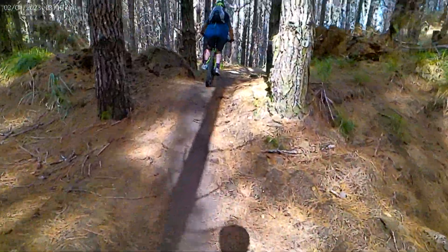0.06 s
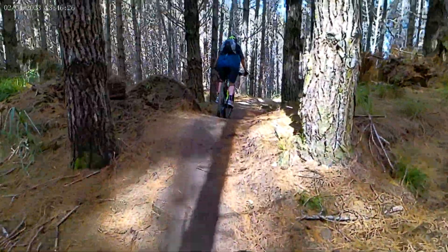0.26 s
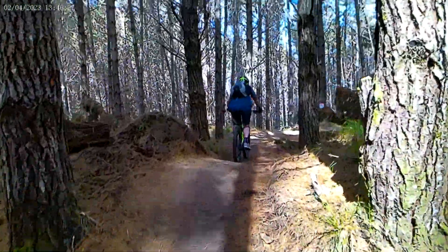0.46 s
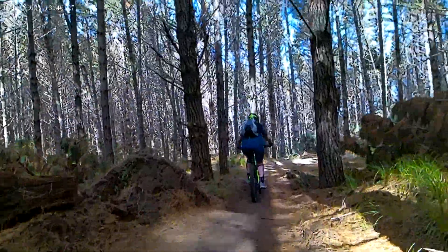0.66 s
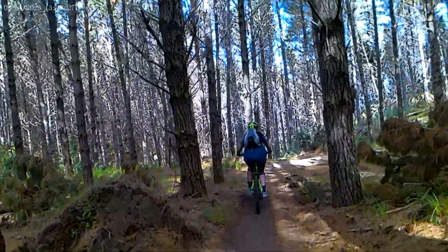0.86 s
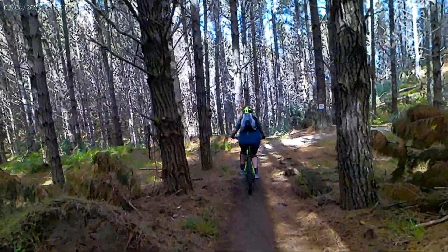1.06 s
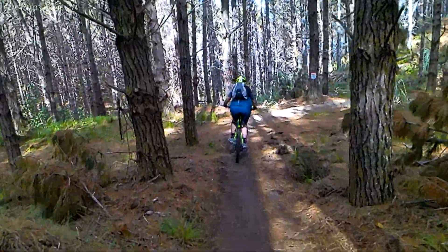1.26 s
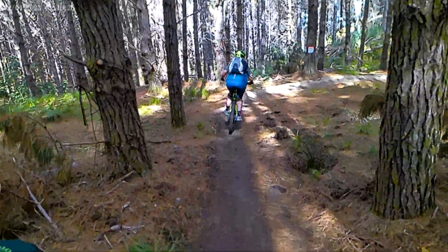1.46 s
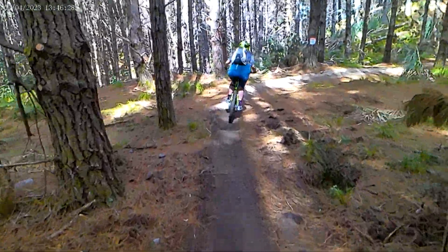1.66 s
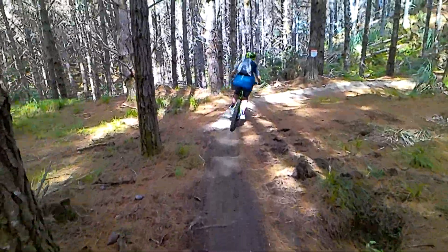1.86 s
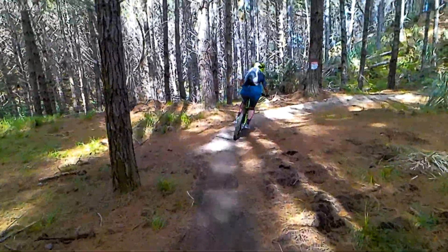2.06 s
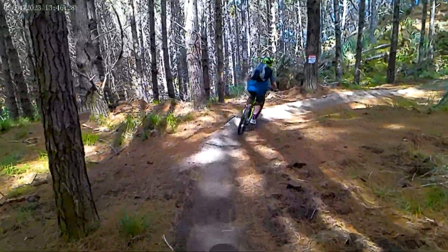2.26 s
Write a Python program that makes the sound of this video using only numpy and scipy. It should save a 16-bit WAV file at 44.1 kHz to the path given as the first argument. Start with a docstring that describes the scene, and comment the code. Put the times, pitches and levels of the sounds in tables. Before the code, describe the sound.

Mountain bike jolting along a dirt forest trail, irregular deep thuds and hard knocks on the microphone

```python
"""A dirt forest trail, ridden on a mountain bike with the camera's microphone carried by the rider.
Bumps heave the camera with soft, deep thuds: pulses through sprung masses, with shudders of dull noise.
Short contacts knock it on its mount, where it rocks, rings and rattles; the hardest overload the input.
Underneath, shaped noise gives a faint ride rumble, tyres on dry needles and hiss; small ticks of
chain and grit are noise bursts that ring briefly."""
import sys
import numpy as np
from scipy import signal
from scipy.fft import rfft, irfft
from scipy.io import wavfile

SR = 44100
rng = np.random.default_rng(int(sys.argv[2]) if len(sys.argv) > 2 else 0)


def master_out(mix):
    """Clip the mix to full scale and print it as 16-bit PCM to the path in sys.argv[1]."""
    frames = np.transpose(np.atleast_2d(mix))
    ceiling = np.clip(frames, -1, 1)
    pcm = np.round(ceiling * 32767).astype(np.int16)
    wavfile.write(sys.argv[1], SR, pcm)


N = 103635
T = np.arange(N) / SR  # time in seconds


def from_db(db):
    """Decibels to amplitude gain."""
    return 10 ** (np.asarray(db) / 20)


def noise(spectrum):
    """Noise of rms 1, coloured by (Hz, relative dB per Hz) points joined on a log-frequency axis."""
    hz, db = np.transpose(spectrum)
    bins = np.maximum(np.arange(N + 1) * SR / (2 * N), 1)
    gain = from_db(np.interp(np.log(bins), np.log(hz), db))
    x = irfft(rfft(rng.standard_normal(2 * N)) * gain)[:N]
    return x / x.std()


def drift(hz):
    """Random wander of spread 1: white noise smoothed by two equal poles at hz."""
    pole = np.exp(-2 * np.pi * hz / SR)
    white = rng.standard_normal(N + SR)
    x = signal.lfilter([1], [1, -2 * pole, pole * pole], white)[SR:]  # drop the filter's first second
    return x / x.std()


def sprung(force, hz, q):
    """Acceleration of a mass on a damped spring: a second-order high-pass of the force."""
    w = 2 * np.pi * hz
    b, a = signal.bilinear([1, 0, 0], [1, w / q, w * w], SR)
    return signal.lfilter(b, a, force + 1e-18)  # the offset avoids slow denormal numbers


def ring(force, hz, t60):
    """One mode, driven by the force and falling 60 dB in t60 seconds; gain about 1 at its pitch."""
    r = from_db(-60 / (t60 * SR))
    w = 2 * np.pi * hz / SR
    gain = (1 - r * r) / 2
    return gain * signal.lfilter([1, 0, -1], [1, -2 * r * np.cos(w), r * r], force + 1e-18)


def push(s, db, width_ms):
    """A bell-shaped pulse of force centred on s seconds; the width is its standard deviation."""
    return from_db(db) * np.exp(-.5 * ((T - s) * 1000 / width_ms) ** 2)


def burst(s, db, attack_s, decay_s):
    """Envelope with a straight rise from s seconds and an exponential fall."""
    rise = np.clip((T - s) / attack_s, 0, 1)
    fall = np.exp(-np.maximum(T - s - attack_s, 0) / decay_s)
    return from_db(db) * rise * fall


def rolling():
    """Rumble of the ride and rustle of the tyres: coloured noise whose level moves and flutters."""
    # Levels of the rumble and of the tyres. Each row: time in seconds, level in dB before flutter.
    ride_level = [(0, -33), (.3, -42), (.68, -38), (.8, -38.5), (.87, -42), (1.0, -38), (1.12, -47),
                  (1.32, -46), (1.38, -32.5), (1.55, -45), (1.7, -41.5), (1.88, -43), (2.0, -38.5),
                  (2.12, -43.5), (2.35, -43)]
    rolling_level = [(0, -51.5), (.45, -55), (1.0, -55.5), (1.15, -55.5), (1.4, -55.5), (1.8, -56),
                     (2.1, -55.5), (2.35, -54)]
    # Colours of the rumble and of the tyres. Each row: frequency in Hz, relative level in dB per Hz.
    rumble_colour = [(20, 7), (45, -1.5), (80, 0), (115, -6), (175, -9), (290, -17.5), (500, -28),
                     (900, -35.5), (2000, -72)]
    tyre_colour = [(200, 2.5), (420, 8.5), (600, 2), (950, 2.5), (1250, 0.5), (1550, 1), (2000, -0.5),
                   (3100, -9), (3800, -9.5), (4350, -8), (5500, -15.5), (6900, -13), (9000, -18)]
    rumble_flutter_db, rumble_flutter_hz = 3.14, 60
    tyre_flutter_db, tyre_flutter_hz = 2, 46

    rumble_db = np.interp(T, *np.transpose(ride_level)) + rumble_flutter_db * drift(rumble_flutter_hz)
    rumble = from_db(rumble_db) * noise(rumble_colour)
    tyre_db = np.interp(T, *np.transpose(rolling_level)) + tyre_flutter_db * drift(tyre_flutter_hz)
    tyres = from_db(tyre_db) * noise(tyre_colour)
    return rumble + tyres


def bumps():
    """Slow pushes through the suspension heave the camera, each with a dull shudder of noise."""
    # Bumps. Each row: pulse centre in seconds, force in dB, pulse width in ms, shudder level in dB.
    bump_rows = [(0.119, -15.5, 7.9, -44), (0.3363, -7, 8.2, -34.5), (0.5427, -7, 6.6, -36),
                 (0.744, -19.5, 14.2, -52), (0.945, -19.5, 7.8, -49), (1.24, -24.5, 9.3, -45.5),
                 (1.4584, -5, 5.16, -28), (2.068, -10.5, 8.1, -37), (2.273, -13.5, 14.3, -68)]
    # Colour of the shudder. Each row: frequency in Hz, relative level in dB per Hz.
    shudder_colour = [(50, -37), (110, 4.5), (200, 11), (350, 0), (700, -9.5), (1500, -19), (3000, -51),
                      (8000, -55)]
    heave_hz, heave_q, heave_cut_hz = 14.24, 0.82, 6.96
    lead_s, attack_s, decay_s = 0.017, 0.0071, 0.031  # the shudder starts ahead of the pulse centre

    force = sum(push(s, db, width_ms) for s, db, width_ms, _ in bump_rows)
    envelope = sum(burst(s - lead_s, db, attack_s, decay_s) for s, _, _, db in bump_rows)
    heave = sprung(force, heave_hz, heave_q)
    heave = sprung(heave, heave_cut_hz, np.sqrt(.5))  # a second low cut
    return envelope * noise(shudder_colour) - heave


def knocks():
    """Short contacts rock the camera on its mount, as a mass on a spring; the housing rings and rattles."""
    # Knocks. Each row: contact centre in seconds, force in dB, contact width in ms, rocking pitch in Hz,
    # rocking Q, rattle level in dB.
    knock_rows = [(0.2022, 18.5, 1.15, 71.2, 0.78, -30), (0.3902, 24.5, 0.77, 73.7, 0.72, -23),
                  (.5980, 14, 1.08, 81.9, 0.79, -27), (0.7766, -12, 1.5, 74.5, 0.87, -45.5),
                  (0.992, -22.5, 1.4, 90.5, 1.54, -59.5), (1.4557, -4.5, 0.98, 184, 2.53, -31),
                  (1.9212, 9, 2.07, 65, 0.78, -37.5), (2.1300, -17, 2, 85, 0.74, -64)]
    # Modes of the housing. Each row: pitch in Hz, gain in dB, time to fall 60 dB in seconds.
    housing_modes = [(112.1, -8, .05), (198.7, -1.29, 0.0071), (480, -37, 0.061)]
    # Colour of the rattling housing. Each row: frequency in Hz, relative level in dB per Hz.
    rattle_colour = [(60, 6), (130, -29), (270, 35), (480, -32), (600, 26), (800, 1), (1100, -3),
                     (1650, -9), (3000, -40), (8000, -32)]
    lift_share, lift_lead_widths = 0.494, 0.52  # the load lifts just before each contact
    lead_s, attack_s, decay_s = 0.0038, 0.0071, 0.012  # the rattle starts ahead of the contact centre

    out = 0
    rattle_noise = noise(rattle_colour)
    for s, db, width_ms, rock_hz, rock_q, rattle_db in knock_rows:
        lift_s = s - lift_lead_widths * width_ms * .001
        force = push(s, db, width_ms) - lift_share * push(lift_s, db, width_ms)
        rocking = sprung(force, rock_hz, rock_q)
        rings = 0
        for k, (hz, mode_db, t60) in enumerate(housing_modes):
            direction = (-1) ** k  # the modes swing in alternate directions
            rings = rings + direction * from_db(mode_db) * ring(force, hz, t60)
        rattle = burst(s - lead_s, rattle_db, attack_s, decay_s) * rattle_noise
        out = out + rocking + rings + rattle
    return out


def ticks():
    """Faint ticks of chain and grit: noise bursts, each ringing briefly in the part that it strikes."""
    # Ticks. Each row: start in seconds, burst level in dB before ringing, ring pitch in Hz.
    tick_rows = [(0.871, -51.5, 1800), (0.882, -46, 1320), (.947, -54.5, 1320), (.978, -53, 1200),
                 (1.234, -58, 1320), (1.271, -49, 1710), (1.324, -45, 1280), (1.385, -49, 1530),
                 (1.451, -41.5, 1570), (1.497, -53.5, 1545), (1.544, -50, 2240), (2.242, -48, 1190),
                 (2.279, -54, 1800), (2.326, -54, 1550), (2.335, -47.5, 1810)]
    # Colour of a tick. Each row: frequency in Hz, relative level in dB per Hz.
    tick_colour = [(500, -53), (900, 9), (1250, 9), (2000, 6), (3000, -7.5), (4400, -1.5), (6500, -20.5),
                   (14000, -18)]
    attack_s, decay_s = 0.00078, 0.0058
    ring_db, ring_t60_s = 9, 0.019

    out = 0
    grit = noise(tick_colour)
    for s, db, hz in tick_rows:
        tick = burst(s, db, attack_s, decay_s) * grit
        out = out + tick + from_db(ring_db) * ring(tick, hz, ring_t60_s)
    return out


def scene():
    """Everything that reaches the one microphone."""
    return (rolling() + bumps() + knocks() + ticks())[None]


def record(dry):
    """The input clips hard knocks; the electronics hiss; a steep low-pass cuts the top."""
    overload = .705  # clipping level, of full scale
    hiss_db, cutoff_hz = -60, 15900
    clipped = np.clip(dry, -overload, overload)
    hissing = clipped + from_db(hiss_db) * rng.standard_normal(dry.shape)
    low_pass = signal.ellip(10, .1, 70, cutoff_hz, fs=SR, output="sos")
    return signal.sosfilt(low_pass, hissing)


dry = scene()
out = record(dry)
master_out(out)
```